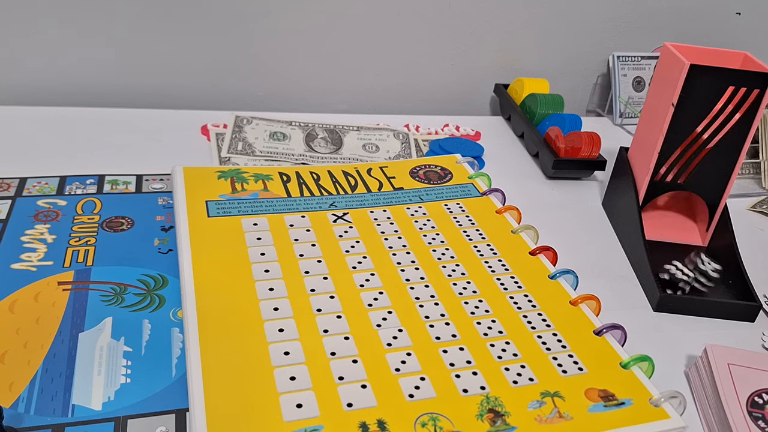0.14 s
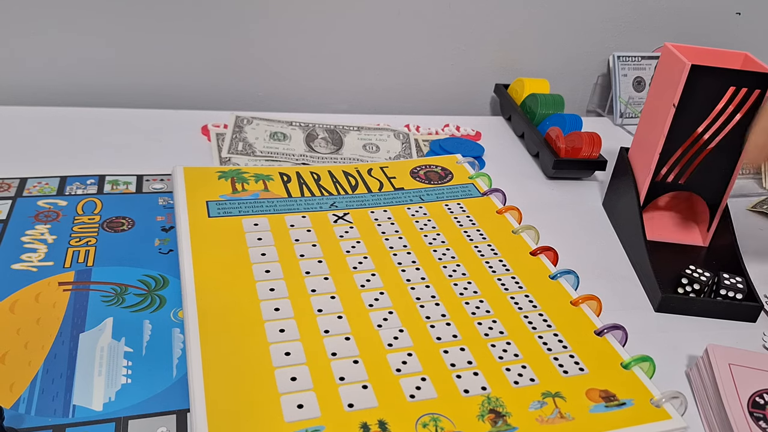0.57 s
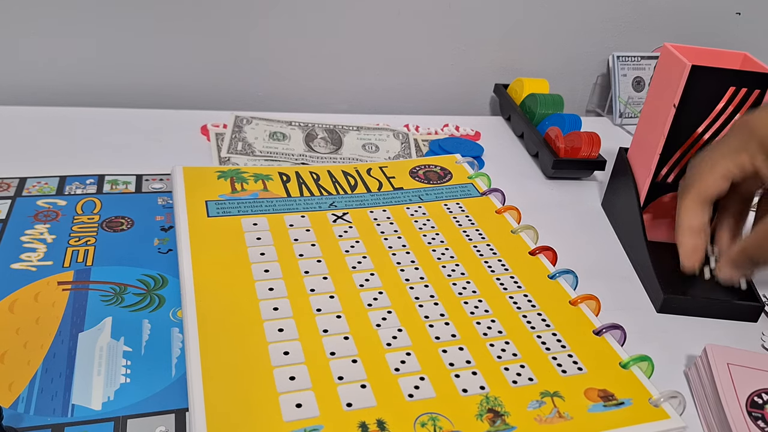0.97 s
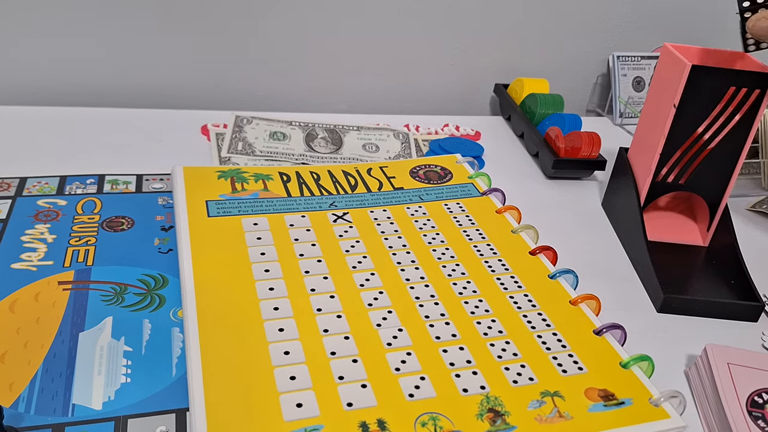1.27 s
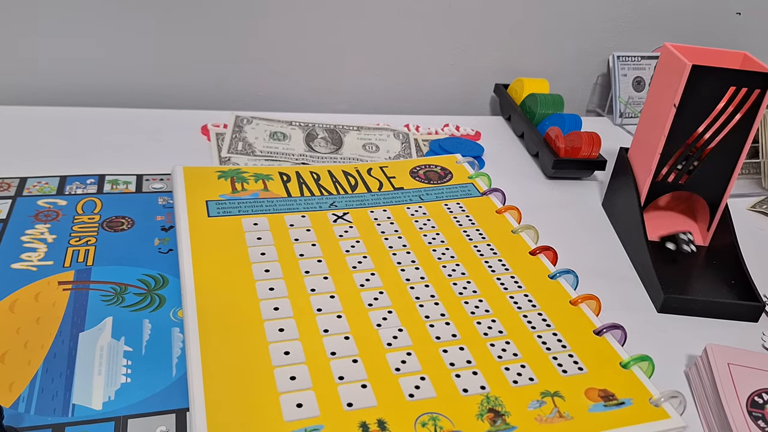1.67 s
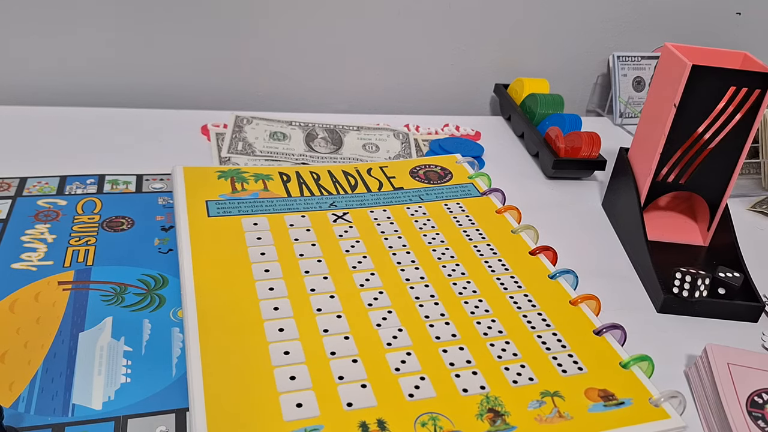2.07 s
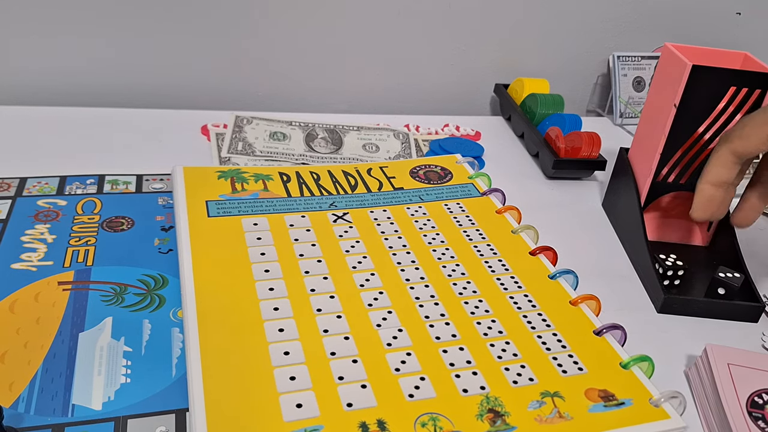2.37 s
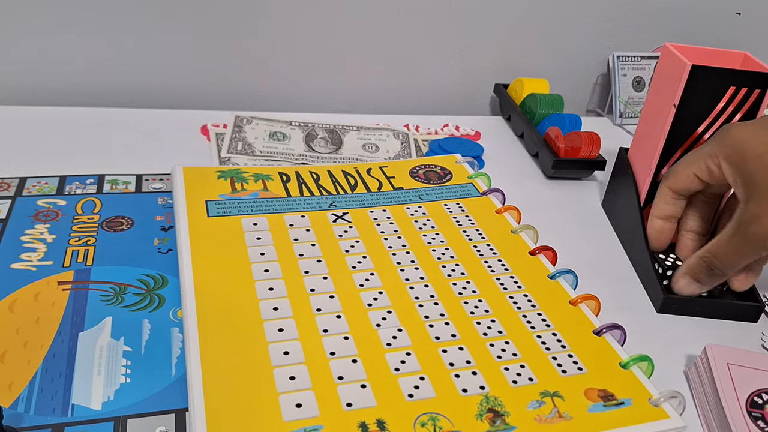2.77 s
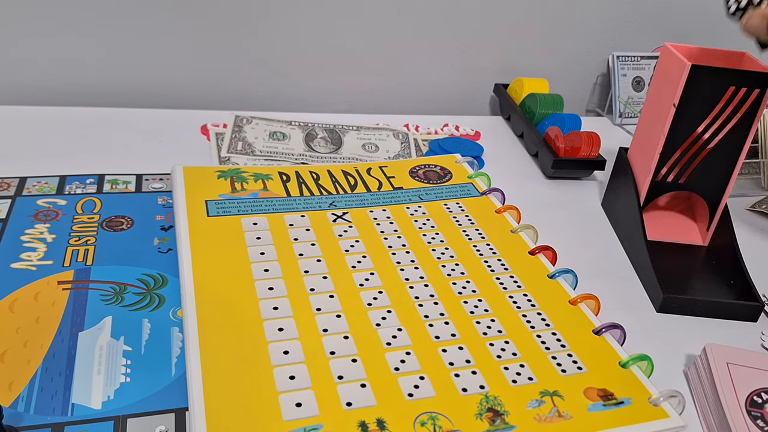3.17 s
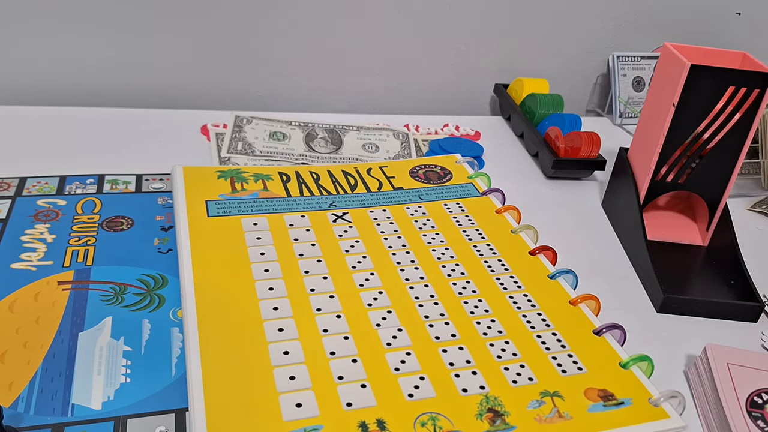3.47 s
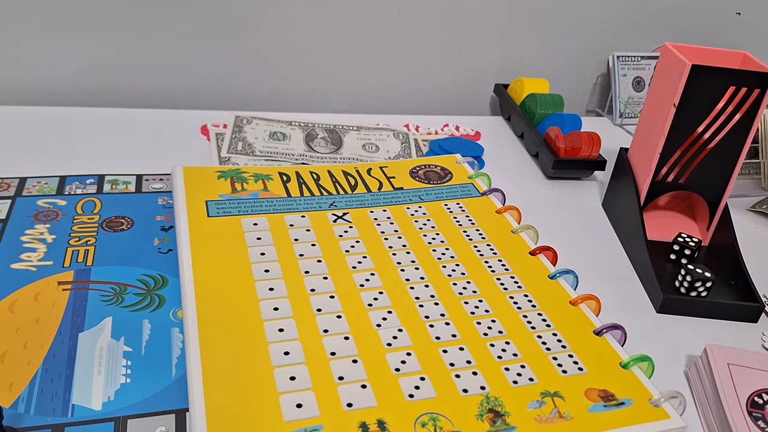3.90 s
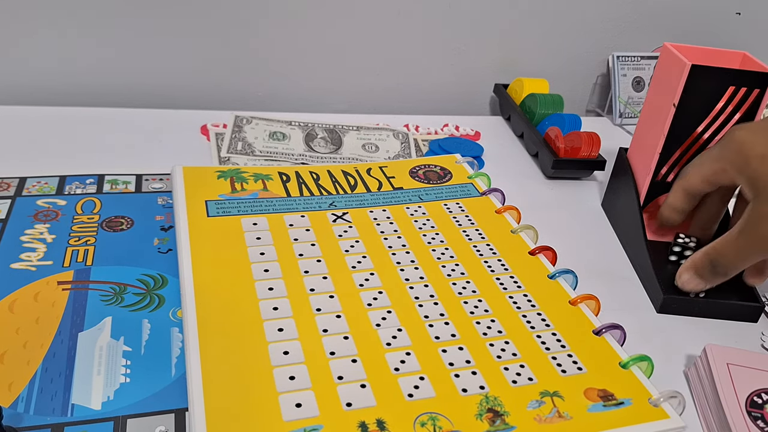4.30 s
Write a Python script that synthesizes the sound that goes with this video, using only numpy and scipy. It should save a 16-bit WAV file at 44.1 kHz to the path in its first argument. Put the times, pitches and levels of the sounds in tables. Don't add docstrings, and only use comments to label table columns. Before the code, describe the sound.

Two dice knock brightly down the ramps of a hollow plastic tower, slightly to the right and near the microphones. Each rattle spills into lower tray bounces and shrinking ticks. Short finger taps and scrapes follow, then a quiet gap before the next drop. Three drops are heard, the first already under way; the indoor background is nearly silent.

```python
import sys
import numpy as np
from scipy import signal
from scipy.fft import rfft, irfft, next_fast_len
from scipy.io import wavfile
from scipy.ndimage import uniform_filter1d

SR = 44100
rng = np.random.default_rng(int(sys.argv[2]) if len(sys.argv) > 2 else 0)


def generate_wav(signal):
    frames = np.transpose(np.atleast_2d(signal))
    scaled = np.clip(frames, -1, 1) * 32767
    pcm = np.round(scaled).astype(np.int16)
    wavfile.write(sys.argv[1], SR, pcm)


def linear_from_db(decibels):
    return 10 ** (np.asarray(decibels, float) / 20)


N = 196200
SIZE = next_fast_len(N + SR // 2)
BINS_HZ = np.maximum(np.arange(SIZE // 2 + 1) * SR / SIZE, 1)
PLACES = 4


def rms_one(x):
    return x / np.sqrt(np.mean(x ** 2) + 1e-20)


def at_hz(points, hz):
    return np.interp(np.log(hz), np.log(np.array(points)[:, 0]), np.array(points)[:, 1])


def coloured(x, response):
    return irfft(rfft(x, SIZE) * response, SIZE)[..., :N]


def ring(clicks, hz, t60):
    r, w = linear_from_db(-60 / (t60 * SR)), 2 * np.pi * hz / SR
    return signal.lfilter([0, np.sin(w)], [1, -2 * r * np.cos(w), r * r], clicks + 1e-18)


# (frequency [Hz], density [dB per Hz])
HUM = [(20, -46.5), (32, -25), (45, -10.5), (59, 4), (75, -11.5), (100, -6), (150, -12), (200, -20.5),
       (265, -15.5), (320, -17), (400, -30.5), (570, -35.5), (700, -42), (1000, -46.5)]
# (frequency [Hz], likeness [-1 to 1])
HUM_LIKENESS = [(30, .6), (60, 0.83), (240, 1), (950, 0.17), (3770, -0.02), (15000, -0.14)]
# (frequency [Hz], width [Hz], level [dB])
HUM_TONES = [(58.7, 8, -71), (323, 9.1, -75), (560, 10, -92.5)]


def hum():
    alike = np.clip(at_hz(HUM_LIKENESS, BINS_HZ), 0, 1)
    shares = np.sqrt([1 + alike, 1 - alike])
    response = linear_from_db(at_hz(HUM, BINS_HZ)) * shares * (BINS_HZ < 1200)
    mid, side = coloured(rng.standard_normal((2, N)), response)
    rumble = linear_from_db(-62) * rms_one(mid + side * [[1], [-1]])
    tones = 0
    for hz, width, db in HUM_TONES:
        resonance = 1 / (1 + (2 * (BINS_HZ - hz) / width) ** 2)
        tones = tones + linear_from_db(db) * rms_one(coloured(rng.standard_normal(N), resonance))
    return rumble + tones + linear_from_db(-84.5) * rng.standard_normal((2, N))


# (frequency [Hz], t60 [s])
ROOM_T60 = [(100, 0.77), (400, 0.23), (1200, 0.18), (4000, 0.25), (12000, 0.14)]
# (frequency [Hz], level re direct [dB])
ROOM_DB = [(100, -9.5), (400, -3), (1200, 1), (4000, -2), (12000, -3.5)]
# (frequency [Hz], likeness [0 to 1])
ROOM_LIKENESS = [(100, 0.92), (250, 0.17), (500, 0.19), (1500, 0)]


def echo_tail():
    t, tail = np.arange(SR // 2) / SR, 0
    for low in 60 * 2.0 ** np.arange(9):
        band = signal.butter(2, [low, min(2 * low, .45 * SR)], "band", fs=SR, output="sos")
        middle = low * np.sqrt(2)
        decay = at_hz(ROOM_T60, middle)
        envelope = linear_from_db(-60 * t / decay + at_hz(ROOM_DB, middle))
        envelope *= np.sqrt(2 * np.log(1000) / (decay * SR))
        common, own = rng.standard_normal(len(t)), rng.standard_normal((2, len(t)))
        alike = np.clip(at_hz(ROOM_LIKENESS, middle), 0, 1)
        noise = np.sqrt(alike) * common + np.sqrt(1 - alike) * own
        tail = tail + envelope * signal.sosfilt(band, noise)
    return tail * np.clip((t - .004) / 0.00087, 0, 1)


# (frequency [Hz], left level, opposite at the right [dB])
SHADOW = [(60, -0.9), (180, 1), (700, -0.8), (1650, -1.5), (4970, -3), (15000, -4.5)]
# (frequency [Hz], extra lag of the left port [rad])
PORT_TWIST = [(200, 0.05), (450, 0.15), (800, 0.9), (1300, 0.16), (2500, 0.022)]


def room(tracks):
    side, left_lag_s = np.array([[1], [-1]]), 0.00018
    lag = (np.pi * BINS_HZ * left_lag_s + at_hz(PORT_TWIST, BINS_HZ) / 2) * (1 + side)
    direct = linear_from_db(1.08 * side * at_hz(SHADOW, BINS_HZ)) * np.exp(-1j * lag)
    echoes = sum(coloured(track[2], rfft(echo_tail(), SIZE)) for track in tracks)
    return coloured(tracks[:, :2].sum(axis=0), direct) + echoes


# (middle [s], length [s], level [dB], frequency [Hz], width [Hz])
BRUSHES = [(.75, 0.18, -87, 1347, 110), (0.759, 0.21, -91.5, 2237, 200), (0.772, 0.21, -88, 4000, 200),
           (2.62, 0.11, -85, 1430, 120), (0.8367, 0.004, -39, 7660, 2500), (0.845, 0.0065, -36, 7600, 2500),
           (2.62, .13, -88.5, 2206, 250), (2.676, 0.042, -53.5, 295, 90), (2.706, 0.029, -64, 4300, 300),
           (2.827, 0.057, -71, 5030, 350), (2.927, .07, -72, 5000, 348), (3.348, .04, -64, 7700, 2970),
           (4.32, 0.044, -53.5, 313, 120.7), (4.41, .08, -71, 5000, 915)]


def brushes():
    out = np.zeros(N + SR)
    for s, length, db, hz, width in BRUSHES:
        swell = np.hanning(round(length * SR))
        t60 = np.log(1000) / (np.pi * width)
        noise = ring(ring(rng.standard_normal(SR // 2), hz, t60), hz, t60)[-len(swell):]
        at = round((s - length / 2) * SR)
        out[at:at + len(swell)] += linear_from_db(db) * np.sqrt(swell) * rms_one(noise)
    return out[:N]


# (time [s], boom [dB], panel [dB], panel frequency [Hz])
THUMPS = [(0.003, -33, -56, 226), (0.047, -28.5, -29, 352), (0.074, -48, -29, 341), (0.105, -29, -31, 353),
          (0.13, -49, -39, 347), (0.177, -44, -33, 358), (0.192, -39, -26.5, 347), (0.243, -69, -31.5, 349),
          (0.288, -36.5, -36, 348), (0.38, -57, -45, 266), (0.431, -51.5, -53, 250),
          (1.438, -40, -35.5, 265), (1.475, -52, -50, 275), (1.515, -36, -32.5, 348),
          (1.544, -35, -49, 374), (1.597, -28, -32, 362), (1.642, -26.5, -47, 290), (1.664, -42, -50, 260),
          (1.727, -46, -37, 350), (1.762, -45, -53, 342), (1.812, -32.5, -33.5, 357),
          (1.858, -45, -49, 360), (1.904, -55, -32.5, 349), (1.94, -40, -34, 256), (1.968, -45, -29, 358),
          (1.991, -44, -33, 362), (2.027, -34, -49, 364), (2.188, -40, -44, 336), (2.26, -44, -49, 340),
          (2.309, -55.5, -46, 258), (2.342, -47, -40.5, 358), (2.388, -46, -42.5, 347),
          (3.386, -26.5, -40.5, 246), (3.421, -28.5, -36, 350), (3.476, -40, -52, 245),
          (3.504, -38, -48, 352), (3.544, -42, -55, 364), (3.578, -31, -33, 342), (3.601, -39, -50, 331),
          (3.651, -30, -32, 374), (3.687, -32, -40, 264), (3.723, -32, -36, 327), (3.757, -42, -31.5, 336),
          (3.781, -29.5, -35, 336), (3.802, -37, -47, 360), (3.844, -43, -34.5, 361),
          (3.897, -50, -42, 233)]


def thumps():
    out, t = np.zeros(N + SR), np.arange(SR // 4) / SR
    swell = 1 - np.exp(-t / .003)
    boom = linear_from_db(-4 - 60 * t / 0.23) * np.sin(2 * np.pi * 145.5 * t)
    for s, boom_db, panel_db, hz in THUMPS:
        panel = linear_from_db(panel_db + 3.5 - 60 * t / 0.082) * np.sin(2 * np.pi * hz * t)
        at = round(s * SR)
        out[at:at + len(t)] += swell * (linear_from_db(boom_db) * boom + panel)
    return out[:N]


# (middle [s], length [s], rattle [dB], grit re rattle [dB], push on the table re rattle [dB])
RUBS = [(.812, 0.066, -66.5, -23.5, -27), (1.0, 0.025, -50, -7, -9), (2.685, 0.055, -65.5, -4.5, 0.5),
        (2.714, 0.062, -51, -17.5, -6.5), (2.745, 0.038, -58, -34, 1.5), (2.808, 0.011, -51, -26, -0.5),
        (2.828, 0.038, -60, -12.5, 6), (2.9, 0.029, -58.5, -11, 0.5), (2.94, 0.056, -60, -18, -2),
        (4.31, 0.024, -50, -12.5, 1), (4.34, 0.062, -50, -25.5, -1.5), (4.385, 0.11, -60, -1, -11),
        (4.42, 0.074, -51.5, -17, -6)]


def rubbing():
    t, power = np.arange(N) / SR, np.zeros((3, N))
    for s, length, db, grit_db, push_db in RUBS:
        swell = np.cos(np.pi * np.clip((t - s) / length, -.5, .5)) ** 2
        power += linear_from_db(db + np.array([[0], [grit_db], [push_db]])) ** 2 * swell
    return np.sqrt(power)


# (time [s], rattle [dB])
ROLLS = [
    [(0, -23), (.02, -38), (.29, -38), (.45, -55)],
    [(1.44, -27), (1.63, -31.5), (1.8, -42.5), (2.1, -53.5)],
    [(3.385, -28), (3.58, -29.5), (3.9, -43.5), (4.0, -44), (4.15, -55.5)],
]


def rolling():
    points = []
    for roll in ROLLS:
        points += [(roll[0][0], -200), *roll, (roll[-1][0], -200)]
    s, level_db = np.transpose(points)
    db = np.interp(np.arange(N) / SR, s, level_db)
    above = db + 35
    return linear_from_db([db, -46.5 + 1.4 * above, -50 + 0.51 * above])


# (frequency [Hz], density [dB per Hz])
CRACK = [(1760, -34), (3000, -1.5), (4030, -7), (4930, -2.5), (7700, -9), (9010, -15), (12000, -16.5),
         (16000, -21.5)]


def hiss():
    mid, side = rms_one(coloured(rng.standard_normal((2, N)), linear_from_db(at_hz(CRACK, BINS_HZ))))
    return 0.43 * mid + .5 * side * [[1], [-1]]


# (frequency [Hz], level [dB], t60 [s])
BODY = [(868, -16, 0.13), (1118.3, -2, 0.037), (1170, -2.5, 0.029), (1350, 3.5, 0.017), (1565, -1.5, 0.03),
        (1750, 1.5, 0.019), (1977.5, 2, 0.03), (2245, 1.5, 0.022), (2450, 3, 0.017), (2670, 0.5, 0.026),
        (3150, -4, 0.0069), (3340, -15.5, 0.042), (3780, -7, 0.033), (4253, -4, 0.026),
        (4620, -4.5, 0.0072), (4830, -4.5, 0.013), (6132, -11, 0.012), (6750, -15.5, 0.025),
        (10600, -18.5, .012)]


def nearness(near_hz):
    return np.exp(-(np.log(np.array(BODY)[:, 0] / near_hz) / .06) ** 2)


def radiate(drive, modes, pan_spread_db):
    out = np.zeros((2, N))
    for hz, level_db, t60 in modes:
        pan_db = pan_spread_db * rng.standard_normal()
        clicks = drive * rng.standard_normal(N)
        out += linear_from_db([[level_db + pan_db], [level_db - pan_db]]) * ring(clicks, hz, t60)
    return out


# (frequency [Hz], level [dB], t60 [s])
TABLE_TOP = [(150, -19, 0.11), (267, -17, 0.08), (355, -16.5, 0.074), (490, -5.5, 0.011), (546, -15, 0.033),
             (666, -1.5, 0.0094)]


def friction(gains, ticks_per_s, uneven_db, tray_db, top_hz):
    rattle, bright, rumble = gains
    sizes = linear_from_db(uneven_db * np.minimum(rng.exponential(1, N), 4))
    ticks = rms_one(sizes * (rng.random(N) < ticks_per_s / SR))
    modes = np.array(BODY) + np.outer(tray_db * nearness(1150), [0, 1, 0])
    body = rms_one(radiate(ticks, modes, 1.6))
    table = rms_one(radiate(1.0, TABLE_TOP, 0.37))
    softened = signal.lfilter(*signal.butter(1, top_hz, fs=SR), hiss())
    grit = rms_one((0.61 + signal.lfilter([.1], [1, -.97], ticks)) * softened)
    return (rattle * body + bright * grit + rumble * table)[[0, 1, 1]]


def struck(modes, heard_db, sent_db, length_ms, detune, sure, size):
    hz, level_db, t60 = np.array(modes).T[:, :, None]
    t, count = np.arange(size) / SR, len(modes)
    draw = rng.standard_normal((count, 7))
    scatter_s = 0.0001 * rng.random((count, 1))
    late = np.maximum(t - scatter_s * [[[0]], [[1]]], 0)
    unsure = 1 - sure[:, None]
    tuned = hz * (1 + detune * unsure * draw[:, :1])
    rings = (np.sin(2 * np.pi * tuned * late) * linear_from_db(-60 * t / t60))[[0, 1, 0]]
    toward_db = [heard_db + 0.92 * draw[:, 1], heard_db - 2.6 * draw[:, 1], sent_db]
    beams = linear_from_db(level_db + np.transpose(toward_db))
    lags = ((np.arange(4) + [0, 1, 1, 1] * rng.random(4)) * length_ms / 4000 * SR).astype(int)
    phase = 2 * np.pi * hz * lags / SR
    pushes = sure[:, None] * np.cos(phase) + (1 - 0.79 * sure[:, None]) * draw[:, 2:6]
    pushes = pushes * [0.99, 0.93, 0.55, 0.3]
    summed = np.abs((pushes * np.exp(1j * phase)).sum(axis=1, keepdims=True))
    pushes = pushes * linear_from_db(2.6 * unsure * draw[:, 6:]) / (summed + 1.1)
    touches = np.einsum("mc,mk->ckm", beams, pushes) @ rings
    out = np.zeros((3, size))
    for k, lag in enumerate(lags):
        out[:, lag:] += touches[:, k, :size - lag]
    out *= np.minimum((size - np.arange(size)) / (size / 4), 1)
    return out / np.sqrt(uniform_filter1d(np.mean(out[:2] ** 2, axis=0), size=SR // 300).max())


def crack(bright, dull, level_db, crack_db, length_ms):
    t = np.arange(bright.shape[1]) / SR
    rise, after = np.minimum(t / .0014, 1), np.maximum(t - 1.1 * length_ms / 1000, 0)
    sheen = linear_from_db(3.5 + 0.3748 * (level_db + crack_db + 17.0))
    burst = linear_from_db(-60 * after / 0.018) + linear_from_db(4 - 60 * t / 0.013)
    burst = burst * (sheen * bright + max(1 - sheen, 0) * dull)
    fizz = linear_from_db(-9.5 - 60 * after / 0.076) * (dull + linear_from_db(-11.5) * sheen * bright)
    return (linear_from_db(level_db + crack_db - 10.5) * rise * (burst + fizz))[[0, 1, 1]]


# (time [s], level [dB], nearest mode [Hz], crack re level [dB], thump re level [dB])
FINGER_KNOCKS = [(0.7963, -54, 1150, -32.5, 14.5), (0.8376, -31.5, 1170, -8, -7),
                 (0.8435, -24, 1172, -8.5, -23), (0.8598, -22, 1177, -3, -7),
                 (0.8669, -29, 1150, -44.5, -14), (0.96, -33.5, 1146, -2.5, -20),
                 (0.963, -49, 2450, -11, -20.5), (1.0085, -43.5, 2450, -7.5, -17),
                 (2.668, -69.5, 1150, -20, 12), (2.686, -60, 1150, -15.5, 15),
                 (2.706, -52.5, 4310, -7.5, -10), (2.83, -52.5, 4910, -4.5, -11),
                 (2.747, -42, 1170, -21, -12), (2.9333, -46.5, 5000, -14, -7),
                 (4.3015, -59.5, 1150, -13.5, 11.5), (2.9092, -36.5, 1170, -5, -8),
                 (3.325, -70.5, 5230, 11, 9), (3.3365, -69.5, 6750, 20, -2), (4.439, -33.5, 5260, 10.5, -9),
                 (4.444, -34, 1170, 3, -1)]
# (time [s], level [dB], main mode [Hz], second mode [Hz], crack re level [dB])
RAMPS_FIRST = [
    (0.021, -9, 1111, 4760, -3.5),
    (0.0291, -9, 4977, 3120, -6),
]
RAMPS_SECOND = [(1.4388, -13.5, 4240, 1830, -7.5), (1.4415, -6.5, 4614, 3640, -5.5),
                (1.451, -14, 3768, 1889, -2.5), (1.4642, -11, 4260, 1959, -3),
                (1.4756, -5.5, 2678, 4253, -7.5), (1.4902, -16, 4370, 2654, -5.5),
                (1.4949, -15, 2595, 4253, -4.5), (1.5165, -11, 1839, 2635, -10.5),
                (1.5259, -9, 1918, 4830, -9), (1.5363, -17, 1035, 4280, 1.5),
                (1.5461, -9, 2478, 6160, -1.5), (1.5605, -14, 2164, 4597, -3.5),
                (1.5753, -22.5, 2203, 2960, -1), (1.5895, -22, 2246, 5103, -10),
                (1.5996, -7, 2630, 1943, -7), (1.6075, -14.5, 2932, 1712, -8.5),
                (1.621, -5, 2672, 3716, -8), (1.6429, -14.5, 4910, 6180, 1),
                (1.6578, -24, 1529, 4510, -4.5), (1.665, -6.5, 1573, 4328, -9),
                (1.6704, -6, 1867, 3720, -12.5), (1.6755, -7.5, 1643, 2627, -5),
                (1.7058, -16, 1508, 2638, -10)]
RAMPS_THIRD = [(3.3758, -18, 3685, 2325, -5), (3.3869, -6.5, 1918, 4940, -6.5),
               (3.392, -11.5, 1853, 6697, -8), (3.3982, -8.5, 1132, 4177, -1.5),
               (3.4114, -6, 1678, 5820, -4), (3.4229, -8.5, 1941, 3665, -4.5),
               (3.4399, -16.5, 1650, 2930, -0.5), (3.4745, -8.5, 2733, 3690, -4.5),
               (3.4787, -7.5, 2640, 1776, -10.5), (3.4846, -8.5, 1820, 4900, -6),
               (3.494, -13, 1783, 2620, -12.5), (3.5376, -12, 1964, 1498, -1),
               (3.5461, -12, 1129, 2760, 0.5), (3.553, -6, 2610, 5080, -6.5),
               (3.5786, -10.5, 2765, 10420, -4.5), (3.5953, -16.5, 2693, 1740, -10),
               (3.6027, -16.5, 2110, 3352, -4.5), (3.6273, -8.5, 1058, 4974, -11.5),
               (3.6367, -7.5, 4866, 1890, -5), (3.646, -22, 3000, 6720, -8),
               (3.6527, -12.5, 5000, 2610, -2.5), (3.659, -6.5, 2756, 4890, -7.5),
               (3.6644, -11.5, 2620, 2086, -14.5), (3.6766, -13, 2760, 1767, -7.5),
               (3.6885, -17, 2600, 3670, -5.5)]
TRAY_FIRST = [(0.0495, -8.5, 2620, 5060, -5), (0.0571, -9.5, 1740, 2800, -15.5),
              (0.0752, -6, 1530, 1200, -9.5), (0.0979, -20.5, 1490, 2320, -18.5),
              (0.1062, -12, 1150, 1550, -7), (0.1317, -11, 2650, 4500, -5.5), (0.1456, -17, 1365, 1720, -6),
              (0.1694, -23, 1400, 4770, 0), (0.1779, -12, 1130, 4960, -4), (0.1936, -7, 1190, 2010, -13),
              (0.2001, -10.5, 1360, 4440, -4.5), (0.2441, -15.5, 1102, 4830, -1.5),
              (0.2667, -27, 1190, 4500, 4), (0.2768, -17, 1360, 6930, 1), (0.2919, -15.5, 1280, 2110, -10),
              (0.312, -28.5, 1140, 3050, -3.5), (0.3382, -23, 1170, 1940, -7),
              (0.3633, -39.5, 1200, 1590, -7), (0.381, -29, 1130, 2040, -8),
              (0.3858, -30.5, 1167, 2020, -16), (0.392, -31.5, 1170, 1990, 3),
              (0.4152, -27, 1060, 1880, -15.5), (0.4356, -27.5, 1183, 1994, -2),
              (0.4505, -49, 1920, 2710, -17)]
TRAY_SECOND = [(1.7278, -13.5, 1907, 3210, -7), (1.7455, -22, 1540, 1920, -9),
               (1.762, -13, 1080, 1705, -3.5), (1.801, -31, 1610, 3122.0, -20),
               (1.8131, -4, 2670, 1950, -9), (1.86, -14, 1140, 2560, 0.5), (1.871, -15, 3870, 1590, -14),
               (1.905, -14, 1470, 2080, -9), (1.916, -22, 1110, 6500, -1), (1.928, -28, 1490, 2330, -17),
               (1.9379, -15.5, 1346, 4600, -8), (1.9446, -15, 2325, 1330, -5.5),
               (1.9694, -16, 1180, 4670, -10), (1.983, -19.5, 1114, 2270, 1.5),
               (1.991, -13.5, 1113, 2600, -9), (2.0108, -16.5, 1260, 2100, -10),
               (2.0287, -26, 1134, 1840, -1), (2.0661, -32, 1186, 1520, -7),
               (2.077, -33.5, 1170, 2010, -6.5), (2.1896, -17.5, 1167, 1525, -12.5),
               (2.235, -26, 1105, 4220, 0.5), (2.261, -25.5, 1137, 4985.0, -16),
               (2.309, -29.5, 1145, 2140, -5.5), (2.317, -41, 1170, 2024.0, -7),
               (2.329, -40, 1160, 2110, -3), (2.3355, -36, 1390, 2560, 0), (2.3433, -23, 1070, 2060, -5.5),
               (2.3894, -30, 1318, 3140, -5.5), (2.4175, -39.5, 1100, 2050, -25),
               (2.432, -46, 1175, 2200, -7.5)]
TRAY_THIRD = [(3.7073, -16.5, 1533, 1205, -7), (3.7231, -14.5, 1500, 2070, -3),
              (3.7386, -17.5, 1540, 3900, -6), (3.7578, -9, 1525, 4740, -6.5),
              (3.7699, -17, 2340, 3300, -5), (3.7836, -12.5, 1353, 2720, -8),
              (3.8026, -13.5, 1102, 6260, 0), (3.8201, -17, 1590, 2110, -15.5),
              (3.8458, -18.5, 2220, 1264, -10), (3.8535, -16, 1643, 4550, -0.5)]
SPIN = [(3.8739, -21.5, 2450, 3820, -8.5), (3.9045, -22.5, 2200, 2740, -9.5), (3.9361, -27, 1116, 1670, -7),
        (3.9594, -29.5, 1480, 2315.0, -9), (3.9821, -37, 1130, 2280, -23), (3.9901, -35, 1141.0, 2090, -6),
        (4.0155, -33, 2080, 4860, -18), (4.0244, -47, 1190, 4900, -17), (4.0416, -40, 1120, 1680, -15),
        (4.0532, -31.5, 2200, 4950, -6.5), (4.0818, -35.5, 1120, 4950, -9),
        (4.0987, -33.5, 2090, 4960, -13), (4.1163, -34.5, 2770, 4730, -9.5),
        (4.1351, -37.5, 1170, 4700, -17.5), (4.1474, -62, 2010, 2700, -23)]


def contacts():
    ramp_ring, tray_ring = 1.6, 0.9
    die_hz = 4950
    rows = [(s, db, hz, die_hz, crack_db, thump_db, 2.7, tray_ring)
            for s, db, hz, crack_db, thump_db in FINGER_KNOCKS]
    groups = [(RAMPS_FIRST, -26, 3.0, tray_ring),
              (RAMPS_SECOND + RAMPS_THIRD, -26, 4.0, ramp_ring),
              (SPIN, -29.5, 5.9, tray_ring),
              (TRAY_FIRST + TRAY_SECOND + TRAY_THIRD, -14, 3.0, tray_ring)]
    for table, base_db, length_ms, rings in groups:
        for s, db, hz, second_hz, crack_db in table:
            thump_db = base_db - 0.17 * (db + 15) - 1.5 * np.log2(hz / 1500)
            thump_db += 4.5 * (1.7 < s < 2.5)
            rows.append((s, db, hz, second_hz, crack_db, thump_db, length_ms, rings))
    return sorted(rows)


def knocks():
    out, bright = np.zeros((PLACES, 3, N + SR)), np.pad(hiss(), ((0, 0), (0, SR)))
    dull = signal.sosfilt(signal.butter(4, 7000, fs=SR, output="sos"), bright)
    body_hz, size, even = np.array(BODY)[:, 0], SR // 16, np.zeros(len(TABLE_TOP))
    for k, (s, level_db, near_hz, second_hz, crack_db, thump_db, length_ms, rings) in enumerate(contacts()):
        place = out[k % PLACES]
        at = max(round((s - .0003) * SR), 0)
        near, also = nearness(near_hz), nearness(second_hz)
        favoured = np.maximum(near, also)
        hard_db = (crack_db + 11.5) * np.clip(np.log2(body_hz / 1500) / 2.0, 0, 1)
        hard_db -= 2 * np.abs(np.log2(body_hz / near_hz))
        freed = np.array(BODY) * (1 + np.outer(favoured, [0, 0, rings - 1]))
        freed[[near.argmax(), also.argmax()], 0] = near_hz, second_hz
        freed[:, 1] *= 1 - 0.54 * favoured
        lift_db = np.maximum(11.5 * near, 8.5 * also)
        knock = struck(freed, hard_db + lift_db, hard_db + .3 * lift_db, length_ms, 0.014, favoured, size)
        span = slice(at, at + size)
        place[:, span] += linear_from_db(level_db - 5.5) * knock
        place[:, span] += crack(bright[:, span], dull[:, span], level_db, crack_db, length_ms)
        thump = struck(TABLE_TOP, even, even, length_ms, 0.0053, even + .6, size=SR // 10)
        place[:, at:at + SR // 10] += linear_from_db(level_db + thump_db - 9) * thump
    return out[..., :N]


def scene():
    tracks = knocks()
    tracks[0] += friction(rolling(), ticks_per_s=410.0, uneven_db=2.5, tray_db=-8.0, top_hz=16000)
    tracks[1] += friction(rubbing(), ticks_per_s=1500.0, uneven_db=3.0, tray_db=17.0, top_hz=9050)
    tracks[2] += brushes() + thumps() * linear_from_db([[0], [0], [-12]])
    no_bass = signal.butter(4, 72.0, "high", fs=SR, output="sos")
    return signal.sosfilt(no_bass, room(tracks)) + hum()


def band_limit(x):
    return signal.sosfilt(signal.butter(12, 16810, fs=SR, output="sos"), x)


def record(dry):
    top_cut = signal.cheby2(12, 70, 16800, fs=SR, output="sos")
    mix = signal.sosfilt(top_cut, np.clip(dry, -.93, .93))
    return band_limit(np.clip(mix, -1, 1))


dry = scene()
out = record(dry)
generate_wav(out)
```